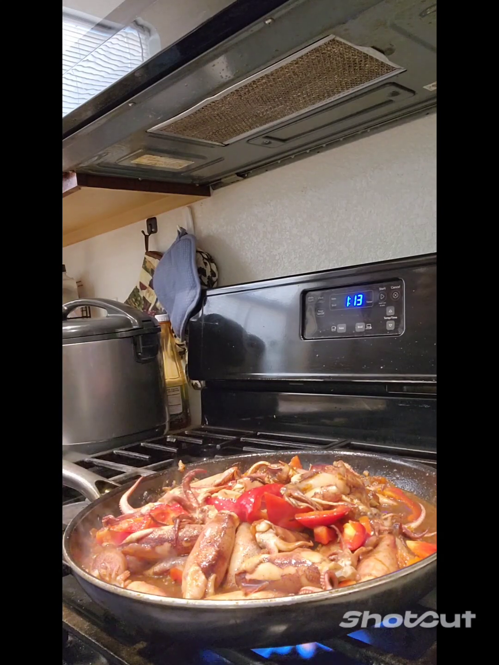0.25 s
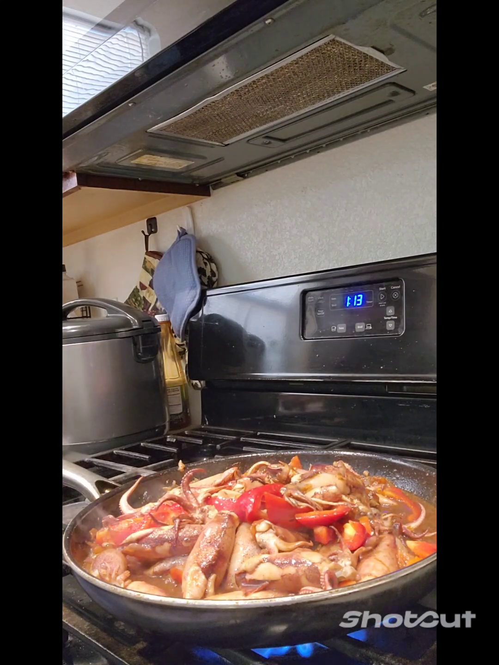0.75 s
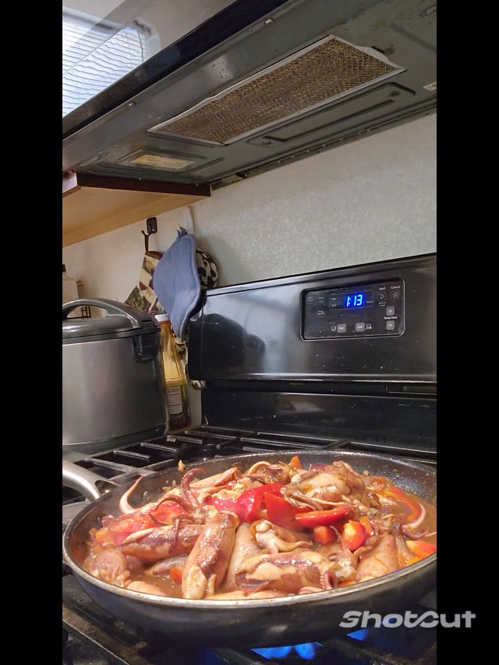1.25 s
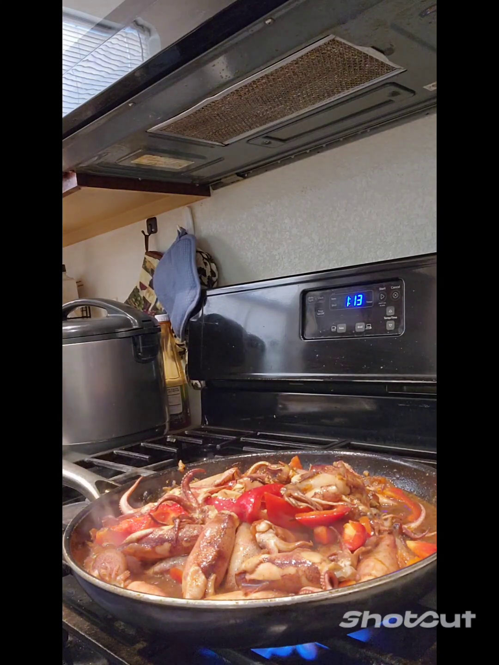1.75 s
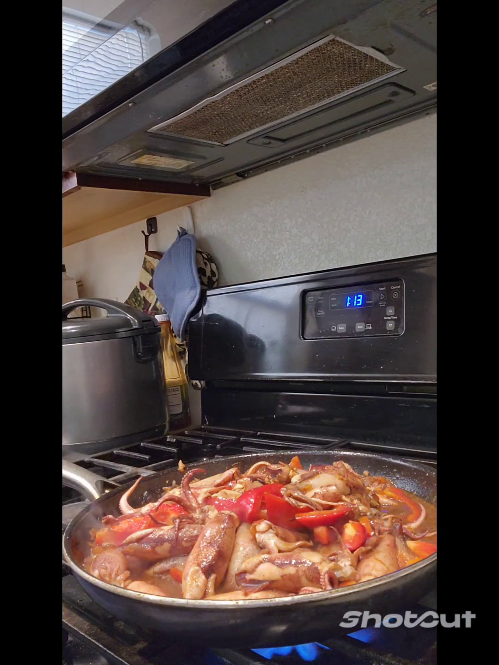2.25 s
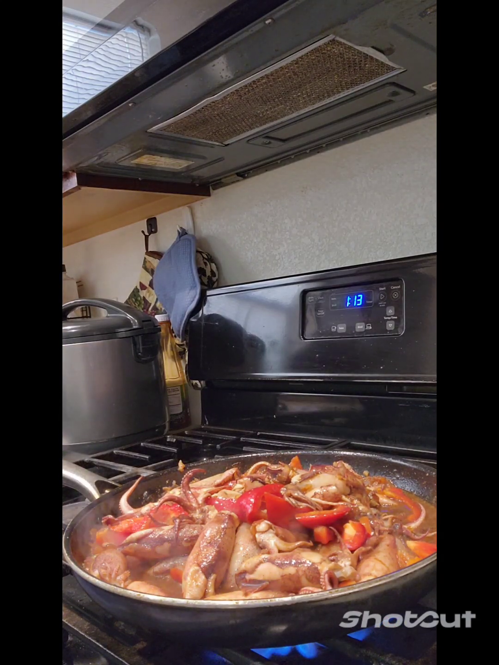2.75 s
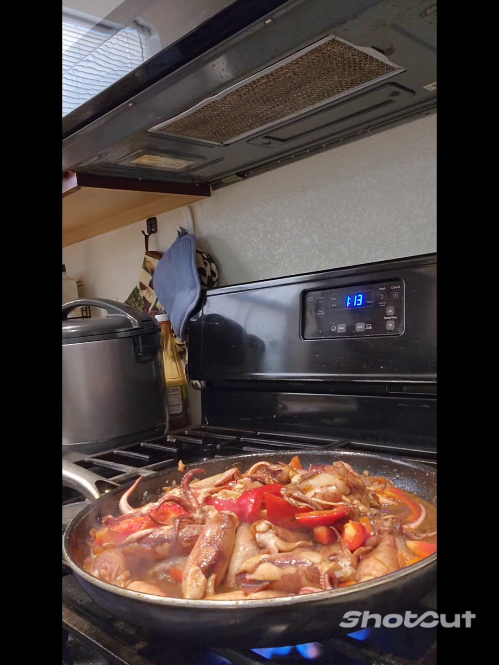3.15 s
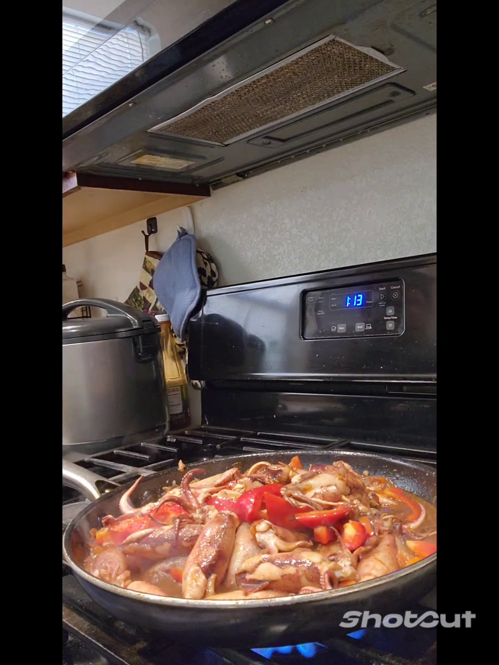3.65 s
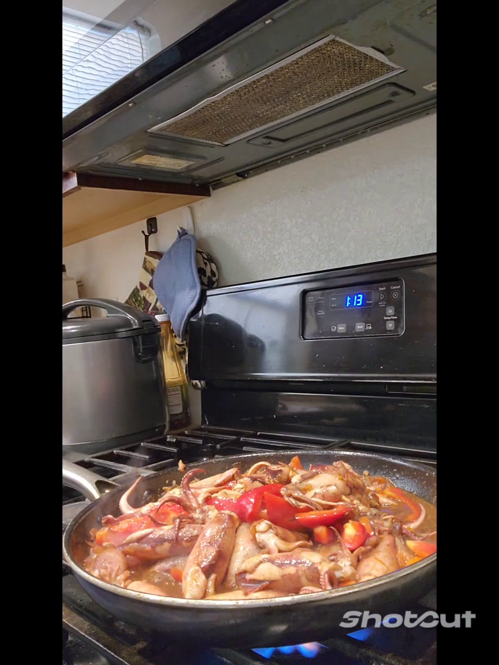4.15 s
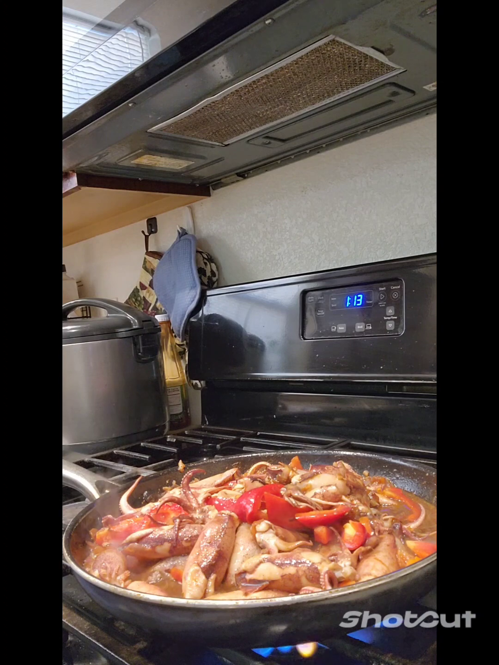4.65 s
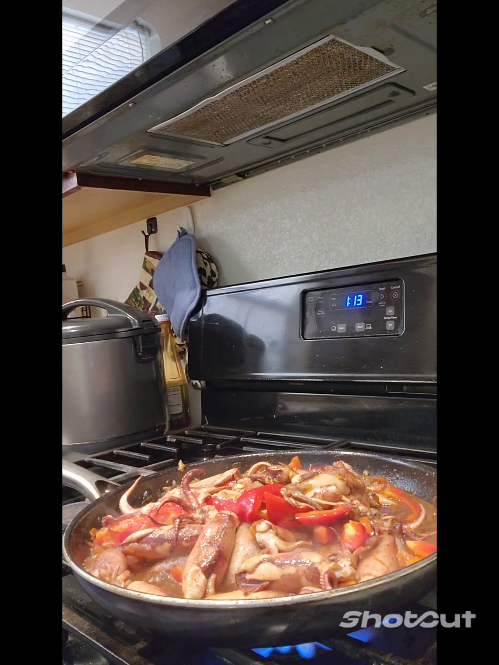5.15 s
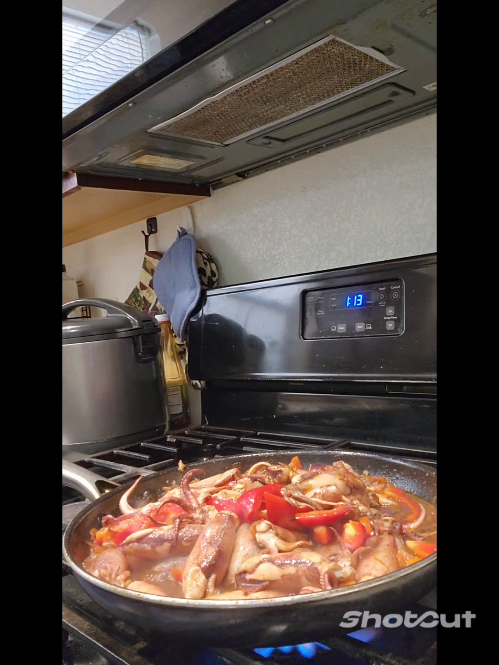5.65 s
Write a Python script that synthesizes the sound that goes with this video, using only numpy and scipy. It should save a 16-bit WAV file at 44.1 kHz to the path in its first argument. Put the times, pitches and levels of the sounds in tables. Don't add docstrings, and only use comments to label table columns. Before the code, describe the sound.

Metal tongs knock a simmering pan, clack and rattle onto a counter, then a cabinet door bangs and a plastic latch clicks.

```python
import sys
import numpy as np
from scipy import signal
from scipy.fft import rfft, irfft, next_fast_len
from scipy.io import wavfile
from scipy.ndimage import uniform_filter1d

SR = 44100
rng = np.random.default_rng(int(sys.argv[2]) if len(sys.argv) > 2 else 0)


def to_wav(sig):
    pcm = np.clip(np.atleast_2d(sig), -1, 1) * 32767
    pcm = np.round(pcm).astype(np.int16)
    wavfile.write(sys.argv[1], SR, pcm.T)


def level_to_linear(level):
    exponent = np.asarray(level, float) / 20
    return 10 ** exponent


N = 259483

# (frequency [Hz], left-right correlation [-1..1])
LIKENESS = [(60, 1), (200, 0.96), (330, 0.81), (640, 0.58), (1400, 0.0064), (3100, 0.24), (6800, -0.064),
            (15000, 0.22)]
# (frequency [Hz], level [dB], t60 [s])
COUNTER_BODY = [(132.6, -5.5, 0.082), (226, -2.5, 0.06), (326, -27, 0.098)]
# (frequency [Hz], density [dB per Hz])
METAL_CRACK = [(180, -36), (300, -20.5), (1620, -12), (2690, -18), (3750, -14), (4720, -28.5),
               (7500, -26.5), (8990, -46), (9600, -38), (15500, -52)]
# (frequency [Hz], density [dB per Hz])
DOOR_CRACK = [(120, -11), (200, -5.5), (1010, -16.5), (1350, -14.5), (1590, -13), (2210, -13), (2600, -19),
              (3240, -16.5), (5590, -14), (14700, -45), (15500, -55)]


def read(table, hz):
    f, v = np.transpose(table)
    return np.interp(np.log(hz + 1), np.log(f), v)


def add(out, x, s):
    i = int(s * SR)
    out[:, i:i + x.shape[1]] += x[:, :N - i]


def walk(rate, size=N):
    k = int(SR / rate)
    held = np.repeat(rng.standard_normal(size // k + 2), k)
    return 1.3 * uniform_filter1d(uniform_filter1d(held, k), k)[:size]


def diffuse(size):
    hz = np.arange(size // 2 + 1) * SR / size
    like = np.clip(read(LIKENESS, hz), -.99, .99)
    mid, side = rfft(rng.standard_normal((2, size)))
    return hz, np.sqrt(1 + like) * mid + np.sqrt(1 - like) * side * np.array([[1], [-1]])


def hiss(colour, size):
    hz, spec = diffuse(size)
    x = irfft(spec * level_to_linear(read(colour, hz)), size)
    return x / np.sqrt(np.mean(x ** 2))


def bands(colour, size, shape):
    hz, spec = diffuse(size)
    spec = spec * level_to_linear(read(colour, hz))
    octaves = np.log2((hz + 1) / 22)
    total = 0
    for k in range(20):
        window = np.clip(1 - abs(2 * octaves - k), 0, 1)
        total = total + shape(22 * 2 ** (k / 2)) * irfft(spec * window, size)
    return total


def ring(modes, t, tilt_db=0, scatter_db=0, start=0., detune=0.013):
    hz, db, t60 = np.repeat(np.transpose(modes), 2, axis=1)[:, :, None]
    size_luck, ear_luck, phase_luck, pitch_luck = rng.standard_normal((4, len(hz), 1))
    apart = (1 - np.clip(read(LIKENESS, hz), 0, 1)) ** 0.53
    decay = np.exp(-np.log(1000) * t / np.clip(t60, .005, .6))
    gain = level_to_linear(db + tilt_db * np.log2(hz / 1500) + scatter_db * size_luck) * decay
    turn = 2 * np.pi * hz * (1 + detune * pitch_luck) * t + start
    ports = []
    for ear in (1, -1):
        ear_gain = level_to_linear(ear * 1.8 * apart * ear_luck)
        ports.append(np.sum(gain * ear_gain * np.sin(turn + ear * .7 * apart * phase_luck), axis=0))
    return np.array(ports)


def blows(events, modes, body, crack, crack_db, rise, body_db, pan_db, loose=0.03, scatter_db=3.5,
          body_rise=0.0036, detune=0.014, grain_db=3.0):
    out, t = np.zeros((2, N)), np.arange(int(.4 * SR)) / SR
    for s, db, tilt_db, chatter in events:
        fade = np.exp(-t / max(chatter, .0003)) * (1 - np.exp(-(t / rise) ** 2))
        jolts = rng.standard_normal(len(t))
        push = 2 * loose * fade * jolts * abs(jolts)
        push[0] = 1
        modal = ring(modes, t[:6144], tilt_db, scatter_db, detune=detune)
        modal = modal * np.minimum(t[:6144] / rise, 1)
        tone = signal.fftconvolve(modal, push[None])[:, :len(t)]
        tilted = [(f, v + tilt_db * np.log2(f / 1500)) for f, v in crack]
        grains = level_to_linear(grain_db * walk(412, size=len(t)))
        noise = level_to_linear(crack_db) * fade * grains * hiss(tilted, len(t))
        sound = tone / abs(tone.mean(axis=0)).max() + noise
        thud = ring(body, t, start=np.pi / 2, detune=.003) * (1 - np.exp(-t / body_rise))
        thud = thud * level_to_linear(body_db - 1.46 * tilt_db)
        pan = level_to_linear(np.array([[pan_db], [-pan_db]]) / 2)
        add(out, level_to_linear(db) * (pan * sound + thud), s - rise / 2)
    return out


def rim_knock():
    # (time [s], peak [dB], brightness [dB/octave], chatter [s])
    hits = [
        (.0893, -12, .6, .0015),
        (.0975, -19, -3.5, 0.0073),
    ]
    # (frequency [Hz], level [dB], t60 [s])
    rim = [(301, -9.5, 0.065), (465, -20, 0.043), (704, -14.5, 0.042), (894, -16, 0.063), (1114, -7, 0.048),
           (1335, 3, 0.021), (1565, -2.5, 0.012), (1700, -2.5, 0.011), (2022, -14.5, 0.035),
           (2210, -23, 0.034), (3260, -34, 0.022), (5400, -30, 0.01)]
    stove = [(65, 1.5, 0.5), (83, -15, 0.43), (113.6, -3.5, 0.18), (147, -5, 0.1), (202, -7, 0.16)]
    # (frequency [Hz], density [dB per Hz])
    crack = [(180, -16), (300, -10), (535, -3.5), (1180, -10), (2140, -8), (2520, -26), (3400, -7),
             (5600, -13.5), (15500, -52)]
    return blows(hits, rim, stove, crack, crack_db=-7.0, rise=0.00098, body_db=-12, pan_db=2.0,
                 loose=0.0074, scatter_db=-1.2, body_rise=0.016)


def tongs_clacks():
    # (time [s], peak [dB], brightness [dB/octave], chatter [s])
    first = [
        (.8195, -17, 0.63, 0.0028),
        (.8222, -15.5, 0.038, 0.0054),
    ]
    second = [
        (.9995, -35, -3, 0.0066),
        (1.0045, -12, -1.7, 0.0042),
        (1.0112, -17.5, -1.7, 0.007),
    ]
    taps = [(.876, -28, -2.5, 0.0062), (1.132, -40, -1, .008), (1.157, -26, -3, 0.0019),
            (1.167, -41, 3, 0.0057), (1.236, -40, 4, .005), (1.269, -38, -1.5, 0.024),
            (1.408, -31, -2, 0.0095), (1.49, -40.5, 3, 0.015)]
    # (frequency [Hz], level [dB], t60 [s])
    tips = [(614, -7.5, 0.04), (733, -8, 0.024), (1255, 2.5, 0.027), (1640, -1, 0.03), (2113, -13, 0.069),
            (2440, -8.5, 0.032), (3010, -16, 0.027), (3210, -16, 0.028), (3685, -7.5, 0.047),
            (4370, -17.5, 0.067), (5077, -6, 0.024), (6280, -14, 0.022), (7600, -23, 0.045)]
    arms = [(530, -12.5, 0.028), (760, -10, 0.026), (900, -8, 0.03), (1190, 2.5, 0.022),
            (1320, -3.5, 0.026), (1596, 4, 0.027), (1545, -14, 0.16), (2113, -6.5, 0.036), (2290, -10, .04),
            (3140, -20, 0.03), (3400, -8, 0.022), (4190, -10, 0.022), (5500, -16, 0.025), (912, -19, 0.2)]
    handle = [(510, -9, 0.016), (907, 3, 0.016), (1370, -6.5, 0.025), (1625, -10.5, 0.034),
              (2300, -19, 0.043), (3150, -16, 0.028)]
    out = blows(first, tips, COUNTER_BODY, METAL_CRACK, crack_db=-2.5, rise=0.0012, body_db=-12.5,
                pan_db=4.0, scatter_db=-1.0, detune=0.0036)
    out += blows(second, arms, COUNTER_BODY, METAL_CRACK, crack_db=-3.0, rise=0.0015, body_db=-24.5,
                 pan_db=4.5, scatter_db=0.0, detune=0.007)
    out += blows(taps, handle, COUNTER_BODY, METAL_CRACK, crack_db=-10.5, rise=.0012, body_db=-42,
                 pan_db=2.0, scatter_db=1.5, detune=0.017, loose=0.039)
    return out


def tongs_laid_down():
    # (time [s], peak [dB], brightness [dB/octave], chatter [s])
    touch = [
        (1.211, -25, -3.5, 0.006),
    ]
    drop_hit = [
        (1.3123, -19, -0.3, 0.009),
    ]
    rattle = [
        (1.3955, -30, -.8, 0.012),
        (1.457, -30.5, -5, .006),
        (1.502, -36, 0, 0.0087),
        (1.728, -37.5, -4, 0.0064),
    ]
    # (frequency [Hz], level [dB], t60 [s])
    laid = [(932, -0.5, 0.025), (1336, 1, 0.028), (1477, 2, 0.024), (1970, -6, 0.031), (2230, -4, 0.037),
            (2350, -14, .04), (3050, -16, 0.05), (3550, -13, 0.044), (4020, -16, 0.046), (4370, -17, 0.07),
            (5010, -3.5, 0.019), (5530, -10, 0.03)]
    dropped = [(917, -3.5, 0.029), (1350, -0.5, 0.017), (1485, 0, 0.018), (1960, -3, 0.032),
               (2230, -5, 0.037), (2600, -17, .03), (3040, -13, 0.04), (3624, -10, 0.03),
               (3930, -12, 0.046), (4390, -12.5, 0.071), (5010, -4, 0.015), (5400, -4, 0.011)]
    out = blows(touch, laid, COUNTER_BODY, METAL_CRACK, crack_db=-7.5, rise=0.002, body_db=-25,
                pan_db=5.0, loose=0.047, scatter_db=1.0)
    out += blows(drop_hit, dropped, COUNTER_BODY, METAL_CRACK, crack_db=-6.0, rise=0.001, body_db=-24.5,
                 pan_db=4.5, scatter_db=1.1, detune=.012)
    out += blows(rattle, laid, COUNTER_BODY, METAL_CRACK, crack_db=-5.5, rise=0.0014, body_db=-26,
                 pan_db=4.5, loose=0.074, scatter_db=3.0)
    return out


def cabinet_door():
    # (time [s], peak [dB], brightness [dB/octave], chatter [s])
    slam = [
        (3.384, -35.5, 0, 0.0073),
        (3.389, -27, 3, 0.0085),
        (3.3925, -11, 1.3, 0.02),
    ]
    rebound = [
        (3.452, -35, .4, .045),
        (3.5075, -25, -2.6, 0.015),
        (3.531, -35, -2.5, 0.028),
    ]
    # (frequency [Hz], level [dB], t60 [s])
    door = [(382, -5, 0.08), (452, -2, 0.07), (525, -1, 0.072), (686, -7, 0.087), (760, -10, 0.1),
            (905, -4, 0.03), (1050, 4, 0.022), (1330, 0.5, 0.03), (1863, -2, 0.02), (2283, -8, 0.049),
            (3688, -8, 0.044), (5500, -10, 0.04)]
    cabinet = [(76.3, -0.4, 0.38), (50.5, -20, 0.14), (66, -3, 0.12), (122, -3.5, 0.15), (173, -7.5, 0.13),
               (254, -9, 0.072), (310, -13, 0.051)]
    out = blows(slam, door, cabinet, DOOR_CRACK, crack_db=-1.5, rise=0.0013, body_db=0.3, pan_db=1.7,
                scatter_db=-0.5, body_rise=0.0015, detune=0.0044, grain_db=1.5)
    out += blows(rebound, door, cabinet, DOOR_CRACK, crack_db=2.5, rise=0.003, body_db=1.5, pan_db=.55,
                 scatter_db=1.1, body_rise=0.007, loose=.06, detune=.02, grain_db=0.5)
    return out


def latch():
    # (time [s], peak [dB], brightness [dB/octave], chatter [s])
    catch = [
        (4.999, -25, 2, 0.0014),
        (5.0035, -36, 1, 0.0057),
    ]
    clicks = [
        (5.133, -51, -5, .002),
        (5.16, -29, 3, 0.0057),
        (5.216, -23.5, -0.5, 0.0023),
        (5.242, -28.5, 1.1, 0.0018),
    ]
    # (frequency [Hz], level [dB], t60 [s])
    striker = [(531, 0, 0.042), (992, -5, 0.051), (1380, -13, 0.032), (1600, 4.5, 0.016), (1810, -8, 0.021),
               (4700, -25, .02)]
    plastic = [(644, -11, 0.031), (1660, 4, 0.032), (2290, -13, 0.014), (5250, -20, 0.013)]
    # (frequency [Hz], density [dB per Hz])
    crack = [(300, -25), (600, -20), (1100, -3), (1700, -8), (2700, -10), (5000, -10), (9000, -22),
             (15500, -36)]
    out = blows(catch, striker, COUNTER_BODY, crack, crack_db=-10.0, rise=.0005, body_db=-38, pan_db=1.0,
                loose=0.032, scatter_db=.8)
    out += blows(clicks, plastic, COUNTER_BODY, crack, crack_db=-9.5, rise=0.00089, body_db=-27,
                 pan_db=1.0, loose=0.04, scatter_db=.8, detune=.008)
    return out


def heel_taps():
    # (time [s], peak [dB], brightness [dB/octave], chatter [s])
    taps = [
        (4.238, -42.5, -3.5, 0.0072),
        (4.511, -44.5, 0, 0.0058),
        (4.592, -39, -0.2, .0095),
        (4.644, -33, 0.9, 0.0042),
        (4.742, -53, -3, .0049),
    ]
    # (frequency [Hz], level [dB], t60 [s])
    heel = [(554, 1, 0.031), (790, -6, 0.016), (1780, -5.5, 0.028), (2214, -5, 0.018), (3350, -21, 0.014),
            (5230, -3, 0.018), (7370, -3, 0.019)]
    return blows(taps, heel, COUNTER_BODY, DOOR_CRACK, crack_db=-3.0, rise=0.0014, body_db=1.0, pan_db=1.5)


def toe_ticks():
    # (time [s], peak [dB], brightness [dB/octave], chatter [s])
    ticks = [
        (4.352, -47.5, -3, .006),
        (4.527, -46, 0, .005),
        (4.596, -51, 3, 0.0033),
        (4.625, -51, -2, .003),
        (4.745, -44.5, -2.5, 0.0063),
    ]
    # (frequency [Hz], level [dB], t60 [s])
    toe = [(2190, -3, 0.018), (2800, -2, .015), (3300, 0, .02), (5100, -8, .012)]
    return blows(ticks, toe, COUNTER_BODY, DOOR_CRACK, crack_db=-1.0, rise=0.00151, body_db=-6, pan_db=3.0,
                 loose=.08)


def squeaks():
    # (start [s], end [s], pitch [Hz], level [dB])
    notes_sung = [
        (1.243, 1.32, 3350, -42.5),
        (5.345, 5.398, 11100, -69),
    ]
    out = np.zeros((2, N))
    for start, end, hz, db in notes_sung:
        size = int((end - start) * SR)
        pitch = hz * (np.linspace(.993, 1.007, size) + 0.0037 * walk(55, size=size))
        note = np.sin(2 * np.pi * np.cumsum(pitch) / SR)
        level = level_to_linear(db + 1.9 * walk(50, size=size)) * signal.windows.tukey(size, .3)
        add(out, level * note * np.ones((2, 1)), start)
    return out


def swells(moves, t):
    s, spread, db = np.transpose(moves)[:, :, None]
    coarse = t[::64]
    bells = level_to_linear(db) * np.exp(-.5 * ((coarse - s) / spread) ** 2)
    return np.interp(t, coarse, np.sum(bells, axis=0))


def shuffle():
    # (time [s], spread [s], level [dB])
    steps = [(0.0, .035, -46.5), (.58, 0.067, -64), (1.5, 0.088, -62), (1.76, 0.061, -59.5),
             (2.576, 0.045, -47), (3.985, 0.016, -50), (4.15, 0.015, -56), (4.255, 0.048, -49),
             (4.351, 0.013, -61), (4.432, 0.015, -56), (4.47, .014, -50), (4.522, 0.011, -57),
             (4.56, 0.059, -52), (4.658, .019, -47.5), (5.64, 0.034, -55)]
    scuffs = [
        (2.53, 0.021, -59.5),
        (2.74, 0.02, -57),
        (2.83, 0.017, -54),
        (4.522, 0.014, -58),
        (5.64, .034, -64),
    ]
    swishes = [(1.939, 0.03, -52), (2.576, 0.038, -66), (3.38, .012, -52), (3.985, 0.0094, -50),
               (4.07, 0.088, -60.5), (4.209, 0.013, -52.5), (4.255, .045, -56), (4.351, 0.014, -63),
               (4.56, 0.058, -57), (4.656, 0.016, -48), (5.002, 0.016, -53), (5.64, 0.032, -56)]
    # (frequency [Hz], density [dB per Hz])
    thump = [(40, -14), (75, 8.5), (135, -5), (250, 4.5), (400, -10), (700, -62.5)]
    scrape = [(250, -60), (500, 15), (1100, 12), (2100, 5.5), (3300, -2), (5000, -78)]
    cloth = [(1800, -8.5), (3500, -3), (4900, 3.5), (5500, 4.5), (6200, -3), (7500, -2.5), (11000, -11),
             (15500, -12)]
    t = np.arange(N) / SR
    step, scuff, swish = (swells(moves, t) for moves in (steps, scuffs, swishes))
    thump_level = step + level_to_linear(-6) * scuff
    scrape_level = scuff + level_to_linear(-10.5) * step + level_to_linear(-9) * swish
    cloth_level = swish + level_to_linear(-13) * scuff
    grain = level_to_linear(2.44 * walk(150))
    out = np.zeros((2, N))
    for level, colour in ((thump_level, thump), (scrape_level, scrape), (cloth_level, cloth)):
        out += level * grain * hiss(colour, next_fast_len(N))[:, :N]
    return out


def kitchen():
    # (frequency [Hz], density [dB per Hz])
    colour = [(13, -39), (22, -3), (87, -1), (124, -5), (267, -11.5), (298, -13), (414, -10), (502, -20),
              (717, -14), (801, -18.5), (869, -15.5), (2150, -20.5), (2750, -24), (3240, -20), (15500, -42)]
    # (frequency [Hz], width [Hz], lift [dB])
    hum = [(352, 21, 4.2), (404, 16, 1.9), (550, 51, 8), (686, 68, 2.5), (2165, 190, 4.8), (3040, 53, 4.4),
           (4680, 350, 3.2), (5460, 260, 6.1)]
    size = next_fast_len(N)
    swell = walk(0.1, size=size)
    x = bands(colour, size, lambda hz: level_to_linear(0.078 * swell + 1.37 * walk(9, size=size)))
    hz = np.arange(size // 2 + 1) * SR / size
    lift = 1 + sum((level_to_linear(db) - 1) / (1 + (2 * (hz - f) / width) ** 2) for f, width, db in hum)
    x = irfft(rfft(x) * lift, size)[:, :N]
    level = level_to_linear(-50 + np.array([[.6], [-.6]]))
    return x * level / np.sqrt(np.mean(x.mean(axis=0) ** 2))


def room(x, wet_db):
    # (frequency [Hz], t60 [s])
    room_t60 = [(60, 0.72), (250, 0.42), (1000, 0.19), (4000, 0.24), (12000, 0.23)]
    t = np.arange(SR) / SR
    walls = [(60, -16), (160, -10), (400, -1), (2000, -1), (15000, -4)]
    tail = bands(walls, SR, lambda hz: np.exp(-np.log(1000) * t / read(room_t60, hz)))
    tail = tail * (1 - np.exp(-t / 0.002)) / np.sqrt(np.sum(tail ** 2) / 2)
    return x + level_to_linear(wet_db) * signal.fftconvolve(x.mean(axis=0)[None], tail)[:, :N]


def scene():
    far = rim_knock() + tongs_clacks() + tongs_laid_down() + cabinet_door() + heel_taps() + squeaks()
    near = latch()
    heard = room(far + 0.6 * near, wet_db=-4.5) + 0.26 * near
    heard += toe_ticks() + shuffle() + kitchen()
    port_lag = 3
    return np.array([np.roll(heard[0], port_lag), heard[1]])


def band_limit(x):
    return signal.sosfilt(signal.butter(12, 15600, fs=SR, output="sos"), x)


def record(dry):
    bass_cut_hz, top_hz = 42, 15300
    x = signal.sosfilt(signal.butter(2, bass_cut_hz, "high", fs=SR, output="sos"), dry)
    x = np.tanh(.6 * x) / .6
    x = signal.sosfilt(signal.ellip(8, .2, 70, top_hz, fs=SR, output="sos"), x)
    return band_limit(x)


dry = scene()
out = record(dry)
to_wav(out)
```